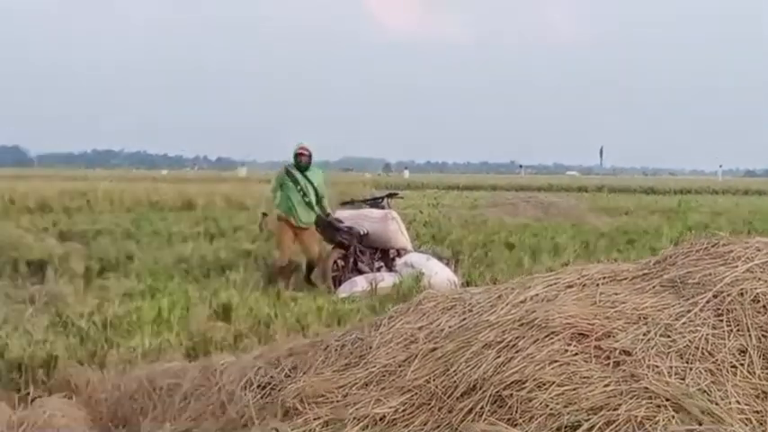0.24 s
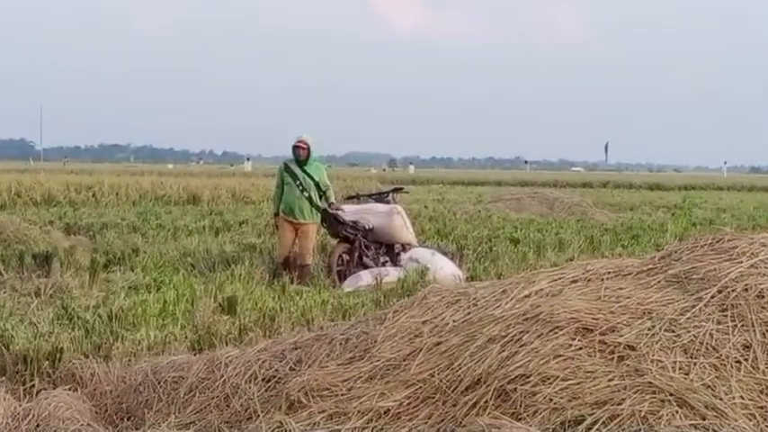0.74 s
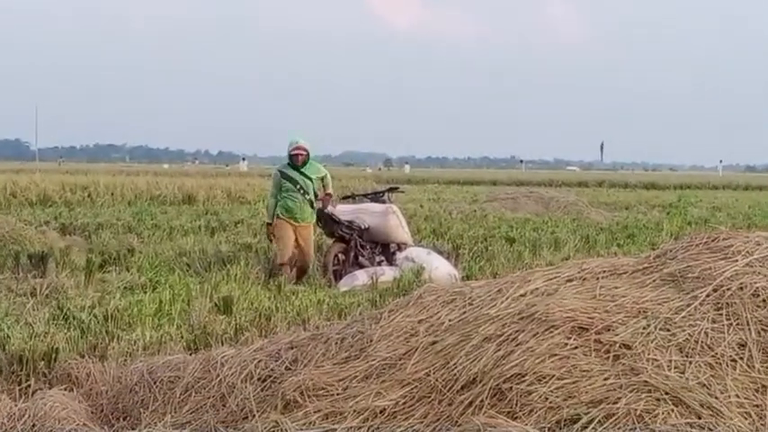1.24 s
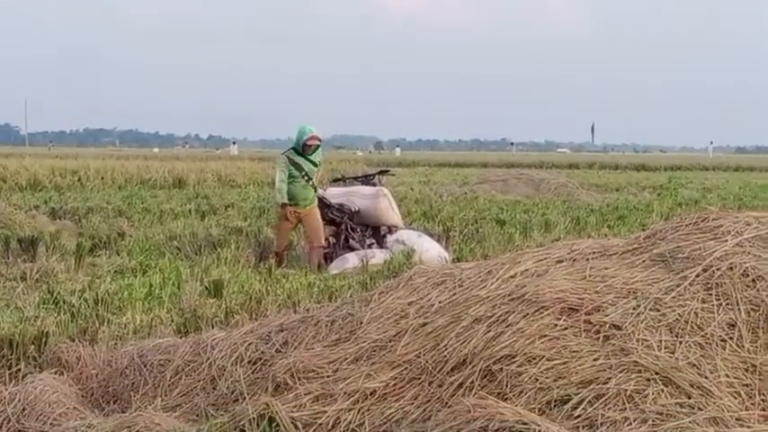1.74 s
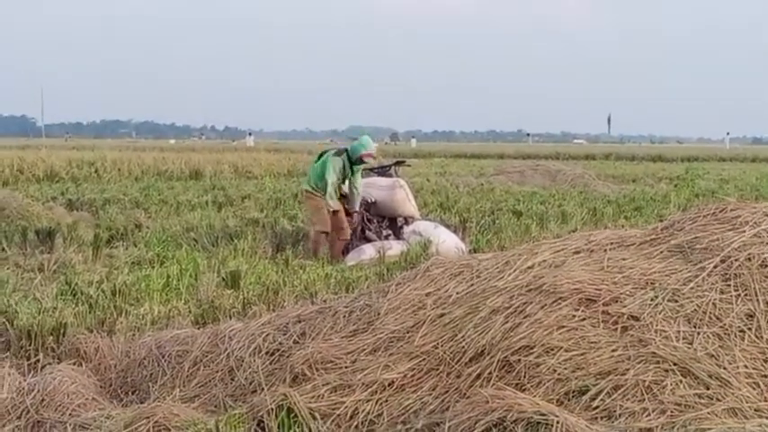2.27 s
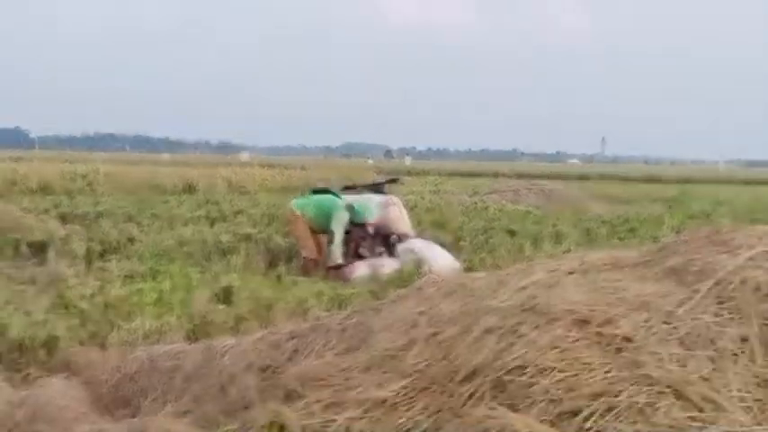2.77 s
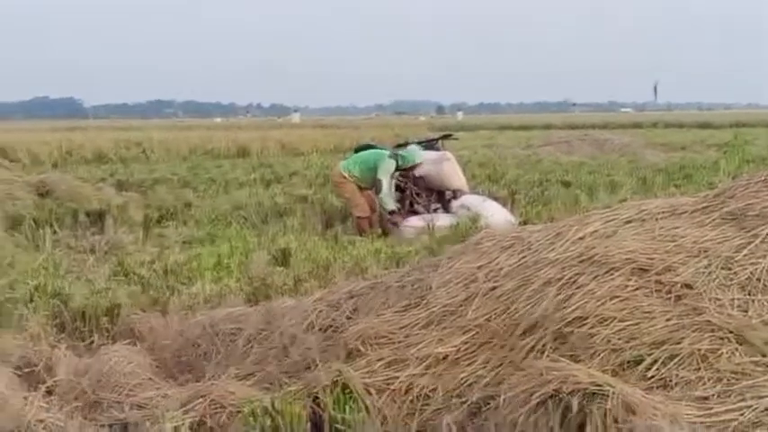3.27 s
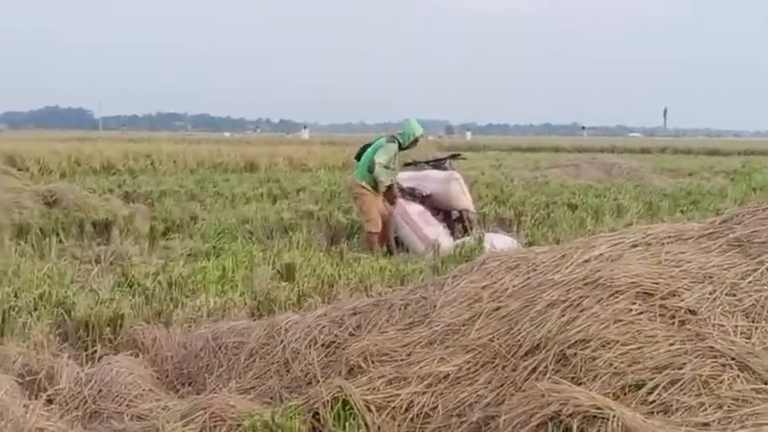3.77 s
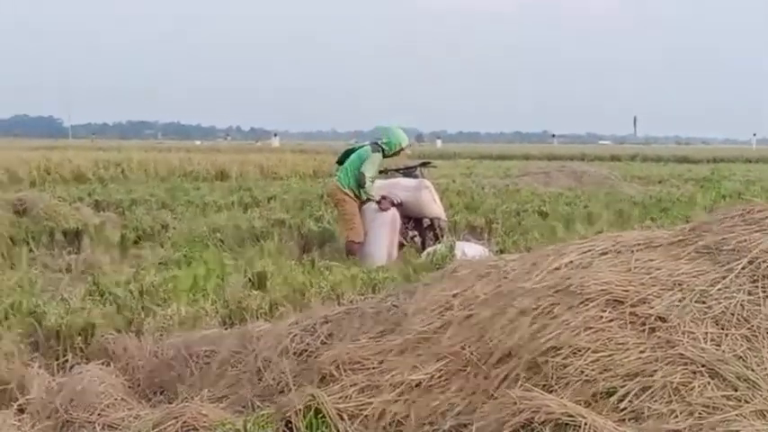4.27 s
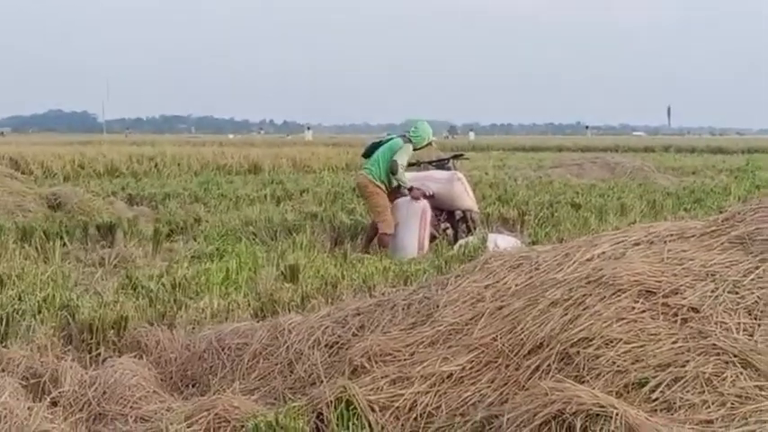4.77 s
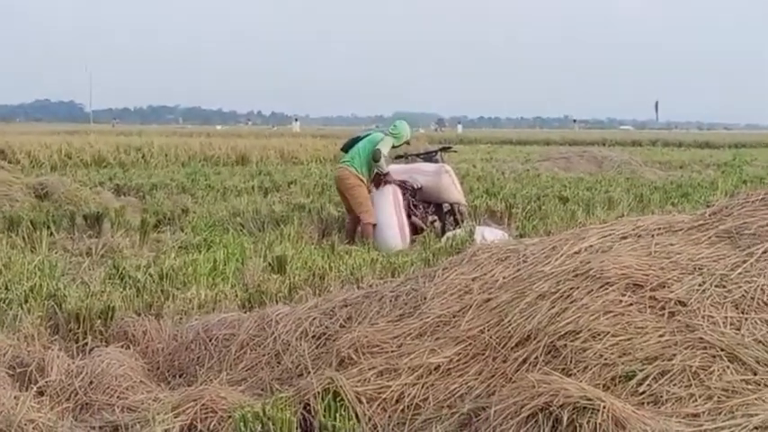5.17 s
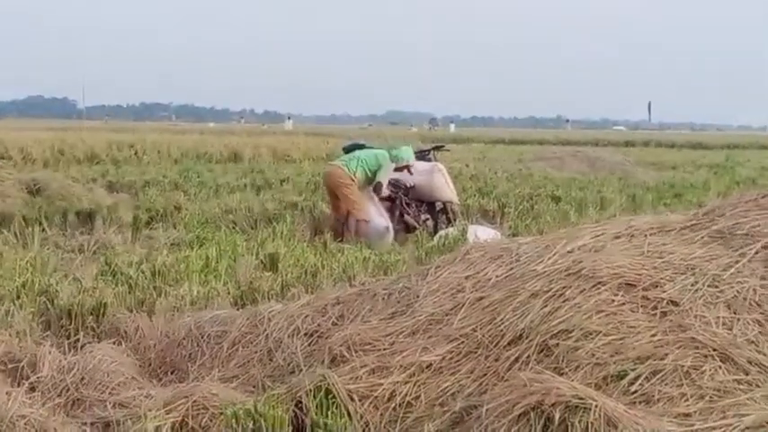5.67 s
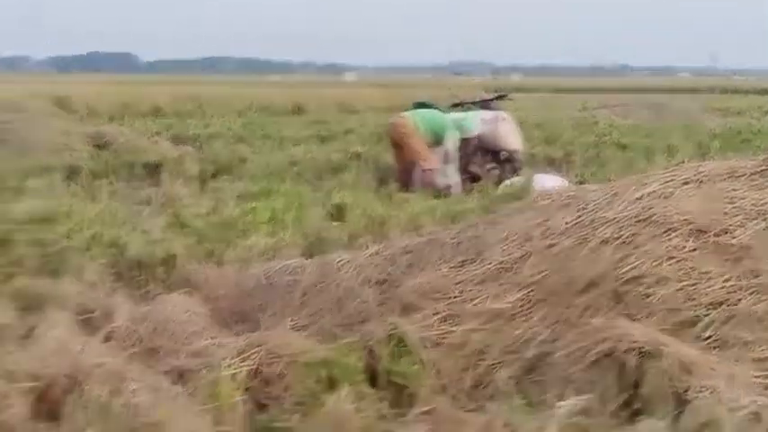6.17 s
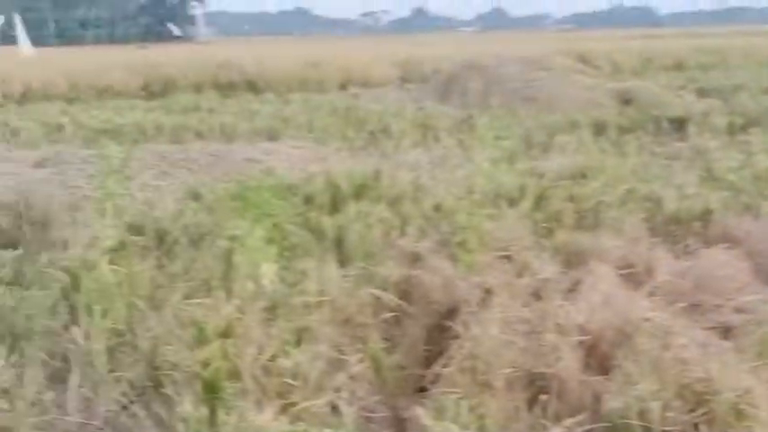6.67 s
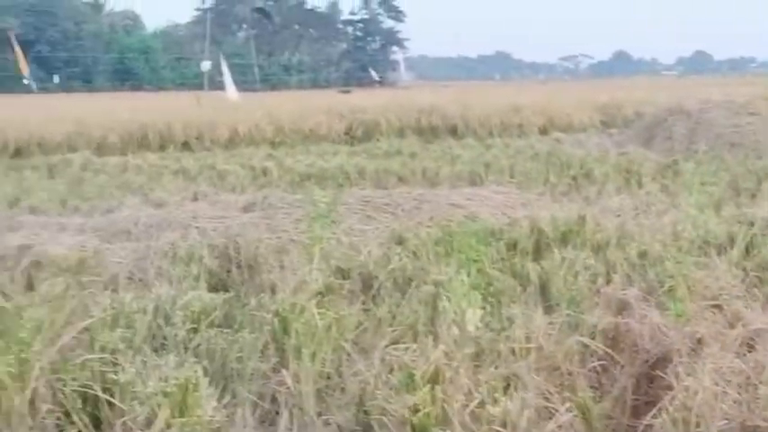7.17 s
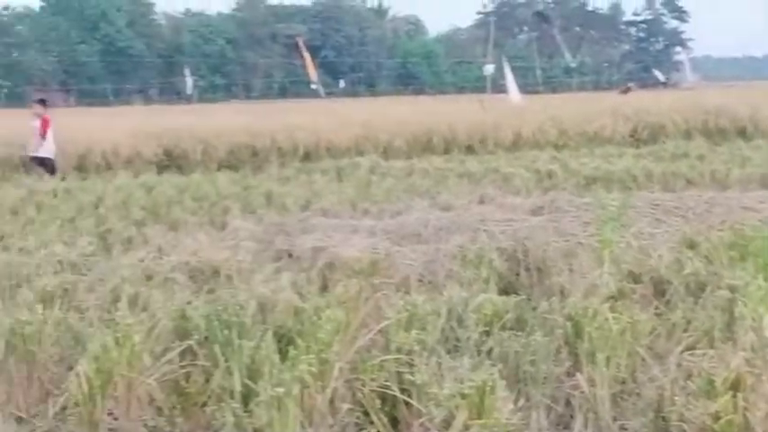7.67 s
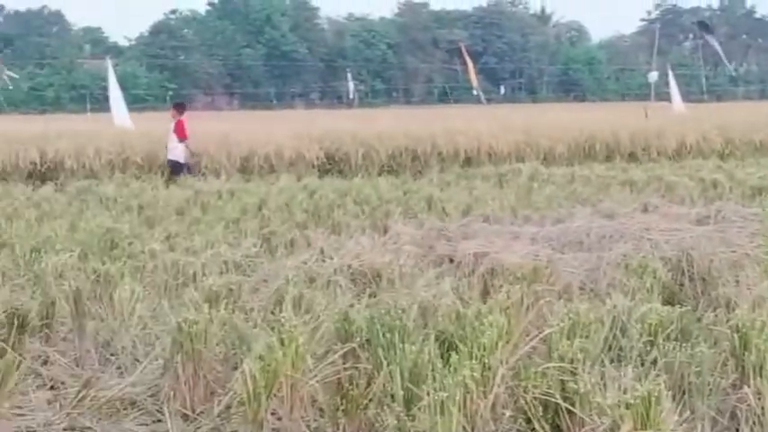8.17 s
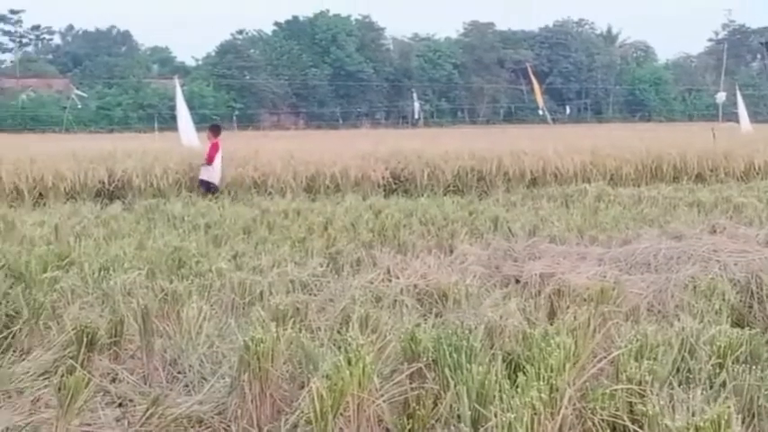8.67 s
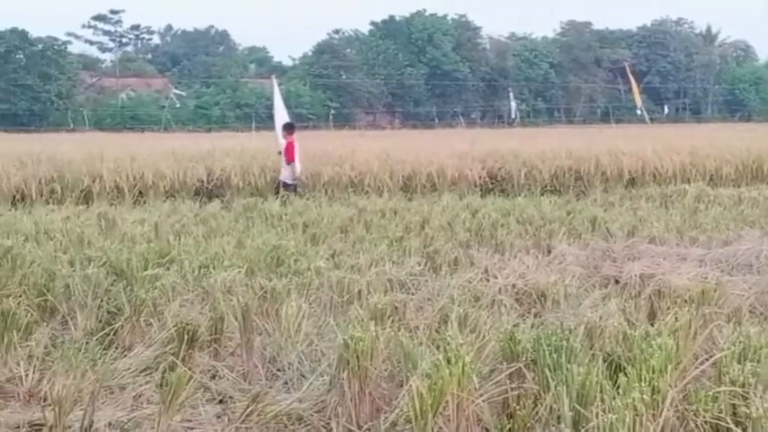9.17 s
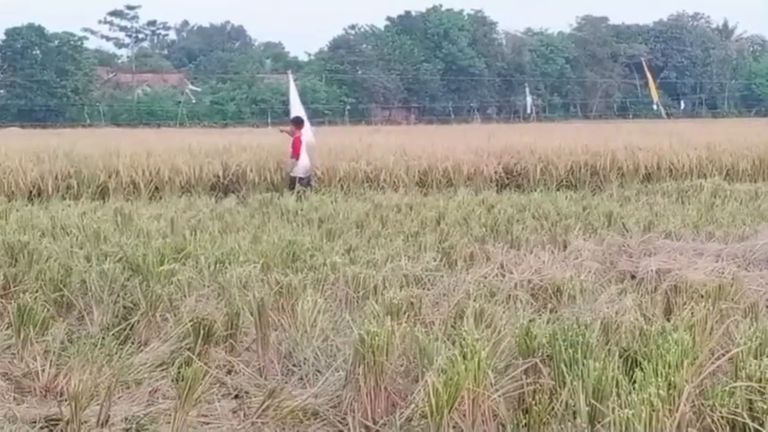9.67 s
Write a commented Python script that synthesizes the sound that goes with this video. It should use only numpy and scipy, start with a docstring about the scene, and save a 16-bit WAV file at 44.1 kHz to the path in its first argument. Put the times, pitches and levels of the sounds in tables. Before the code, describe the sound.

Small frogs peep, croak and quack over a cut rice field with insects ticking, while a small engine idles, stumbles, then revs up.

```python
"""Frogs call across a cut rice field: clear peepers, pulsed croakers, a hoarse rasp and a short quack.
Peeps, croaks and rasps are pulse-gated harmonic stacks; quacks are pulse trains ringing a throat.
Around them lie a band of crickets, a faint high rasp and a ticking insect: gated tones and noise.
A small two-stroke engine, puffs coloured by silencer and pipe, idles some way off on every second turn,
stumbles, then takes throttle and fires on every turn."""
import sys
import numpy as np
from scipy import signal
from scipy.fft import rfft, irfft, next_fast_len
from scipy.io import wavfile
from scipy.ndimage import map_coordinates

SR = 44100
rng = np.random.default_rng(int(sys.argv[2]) if len(sys.argv) > 2 else 0)


def file_out(sig):
    """Save sig as 16-bit WAV at sys.argv[1]."""
    # one column per channel
    cols = np.atleast_2d(sig).T
    # limit, then scale
    lim = np.clip(cols, -1, 1)
    pcm = np.round(lim * 32767).astype(np.int16)
    wavfile.write(sys.argv[1], SR, pcm)


def nominal_scale(level):
    """Amplitude ratio for a level in decibels (scalar or array-like)."""
    x = np.asarray(level, float) / 20
    return 10 ** x


N = 437472


def unit(x):
    """Normalization to unit root-mean-square."""
    return x / np.sqrt(np.mean(x ** 2) + 1e-20)


def along(points, hz):
    """Linear interpolation of (Hz, value) points on a logarithmic frequency axis."""
    f, v = np.transpose(points)
    return np.interp(np.log(hz + 1), np.log(f + 1), v)


def curves(rows):
    """Linear interpolation in time: one value per sample for each column after the time."""
    s, *cols = np.transpose(rows)
    return [np.interp(np.arange(N) / SR, s, c) for c in cols]


def wobble(rate):
    """Band-limited random fluctuation: a smooth curve through rate random knots a second."""
    return unit(map_coordinates(rng.standard_normal(int(N * rate / SR) + 4), [np.arange(N) * rate / SR]))


def coloured(x, points, lag=0.96):
    """Cepstral filtering that keeps white power; lag 1 is minimum phase, 0 is zero phase."""
    m = 2 * next_fast_len(N // 2 + 8192)
    gain = unit(nominal_scale(along(points, np.fft.rfftfreq(m, 1 / SR))))
    cepstrum = irfft(np.log(gain), m)
    cepstrum[1:m // 2] *= 1 + lag
    cepstrum[m // 2 + 1:] *= 1 - lag
    return irfft(rfft(x, m) * np.exp(rfft(cepstrum)), m)[:N]


def add(track, s, sound):
    """Linear superposition of a sound from a given time."""
    track[round(s * SR):][:len(sound)] += sound


# relative spectrum of the cricket band: pitch_hz [Hz], level_db [dB per Hz]
CRICKET_SPECTRUM = [(4800, -70), (5600, -34), (6200, -27), (6450, -12), (6900, -1.5), (7200, -9),
                    (7450, -20), (7700, -42), (8500, -88)]
# distant animals, levels before further gains: start_s [s], cricket_level_db [dB], far_chorus_level_db [dB]
DISTANT_LEVELS = [(0.0, -43.5, -57), (1.41, -44, -63.5), (6, -45.5, -61), (9.92, -44, -50.5)]


def crickets():
    """Stridulation: far wings blur into modulated noise; one nearer sounds a tone in rising chirps."""
    t = np.arange(N) / SR
    strikes = 2 * np.pi * np.cumsum(118 + 6 * wobble(6)) / SR  # tooth strikes, about 118 a second
    blur_gain = nominal_scale(2.2 * np.sin(strikes) + .9 * wobble(25))
    blur = unit(blur_gain * coloured(rng.standard_normal(N), CRICKET_SPECTRUM))
    beat = 9.42 * (t - 8.065) % 1  # position within each chirp period
    wing = np.sin(2 * np.pi * np.cumsum(7020 + 260 * beat + 40 * wobble(200)) / SR)
    chirp = np.sin(np.pi * np.minimum(beat / .65, 1)) ** .6
    near = unit(chirp * np.exp(.8 * np.cos(strikes)) * wing)
    near = near * nominal_scale(np.interp(t, [4, 7], [-12, -2.5]))
    return nominal_scale(curves(DISTANT_LEVELS)[0] - 6.5) * (blur + near)


# faint high insect: start_s [s], level_db [dB]
KATYDID_LEVEL = [(0, -89), (1.6, -100), (4.6, -105), (7.19, -77), (7.22, -102), (9.92, -88)]


def katydid():
    """Stridulation: rasps swell eight times a second, each a train of tooth strikes in a narrow band."""
    t = np.arange(N) / SR
    beat = 8.05 * (t - 6.19) % 1
    rasp = beat * (beat < .93) * np.exp(np.cos(2 * np.pi * 127 * t))  # 127 strikes a second
    band = [(8700, -50.5), (9200, -2.5), (9700, -3), (10200, -53.5)]  # (Hz, relative dB)
    return nominal_scale(curves(KATYDID_LEVEL)[0]) * coloured(unit(rasp * rng.standard_normal(N)), band, lag=0)


# relative spectrum of the open air: pitch_hz [Hz], level_db [dB]
AIR_SPECTRUM = [(25, -9), (750, -18), (1150, -8.5), (1750, -18), (2600, -18), (3300, -18.5), (4600, -32.5),
                (7800, -58), (8600, -93)]


def air():
    """Incoherent summation: the farthest frogs and the open air merge into slowly swelling noise."""
    swell_db = 3.5 * wobble(14)
    level_db = -67.5 + .5 * (curves(DISTANT_LEVELS)[1] + 64) + swell_db
    return nominal_scale(level_db) * coloured(rng.standard_normal(N), AIR_SPECTRUM)


def hiss():
    """Self-noise: the faint, treble-weighted random hiss of a microphone."""
    return nominal_scale(-87) * coloured(rng.standard_normal(N), [(9000, -30.5), (15000, -0.5)])


# crankshaft: start_s [s], speed [turns per s]
CRANK_SPEED = [(0, 35.03), (3.3, 34.73), (4, 35.39), (5.2, 35.31), (6.4, 36.1), (7.17, 37.97),
               (7.27, 28.69), (7.47, 39.27), (7.53, 23.1), (7.62, 33.24), (7.72, 29.08), (7.84, 34.89),
               (8.1, 33.53), (8.3, 34.69), (8.71, 37.6), (8.83, 46.6), (8.89, 50.1), (9.02, 41.9),
               (9.06, 39.5), (9.17, 40.1), (9.29, 37.4), (9.47, 40.6), (9.71, 44.4), (9.786, 45.2),
               (9.92, 43.4)]
# throttle: start_s [s], opening [0-1]; a closed one skips every second firing and burns unevenly
THROTTLE_OPENING = [(0, .05), (5.9, .05), (7.45, 0.1), (7.505, 0.22), (7.525, 0.56), (7.55, 0.56),
                    (7.56, 0.03), (7.68, 0), (7.7, 0.55), (7.82, 0.63), (7.86, 0.42), (8.67, 0.4),
                    (8.71, 0.62), (8.88, 0.84), (9.1, 0.78), (9.92, 0.87)]
# the charge burns weakly or fails to light: start_s [s], length_s [s], level_db [dB]
WEAK_CHARGES = [(0, .62, -6), (5.992, 0.66, -4.5), (7.25, .125, -23), (7.63, .05, -21)]


def firings():
    """Intermittent combustion: one pressure impulse a turn, its strength set by throttle and charge."""
    first_firing = .66  # turns before the first firing
    boom_db, boom_fall_db = -28, 3  # wide open; lost for each tenfold closing of the throttle
    bark_db, bark_fall_db = -22, 23.5
    bark_holds_db = 6  # a weak charge thins the boom; the bark gives way only past this loss
    (speed,), (throttle,), clock = curves(CRANK_SPEED), curves(THROTTLE_OPENING), np.arange(N) / SR
    throttle = np.clip(throttle, .01, 1)
    lit_db = sum(db * ((clock >= s) & (clock < s + length)) for s, length, db in WEAK_CHARGES)
    boom_db = boom_db + boom_fall_db * np.log10(throttle) + lit_db
    bark_loss_db = 1.2 * np.minimum(lit_db + bark_holds_db, 0)
    bark_db = bark_db + bark_fall_db * np.log10(throttle) + bark_loss_db

    turns = np.cumsum(speed) / SR - first_firing + 2
    at = np.flatnonzero(np.diff(np.floor(turns)))
    odd, opening = np.floor(turns[at + 1]) % 2, throttle[at]
    chance = rng.standard_normal((len(at), 3))
    jitter_s = (.00009 + .0006 * (1 - opening) ** 2) * chance[:, 0]  # lean charges light late or early
    at = np.clip(at + (jitter_s * SR).astype(int), 0, N - 1)
    per_puff = np.sqrt(SR / speed[at])  # keeps mean power independent of speed
    scatter_db = 1.1 + 2 * (1 - opening) ** 2
    # past a third of throttle the in-between turn fires too
    catches = np.clip((opening - .36) / .25, .04, 1)
    bark_share = np.where(odd, catches, 1) / np.sqrt((1 + catches ** 2) / 2)
    boom_share = np.where(odd, 0.5 + 0.5 * catches, 1)
    bark, boom = np.zeros((2, N))
    bark[at] = per_puff * bark_share * nominal_scale(bark_db[at] + 0.53 * scatter_db * chance[:, 1])
    boom[at] = per_puff * boom_share * nominal_scale(boom_db[at] + 0.5 + scatter_db * chance[:, 2])
    return bark, boom, throttle, turns


def churn(puffs, t60):
    """Turbulent jet noise: each puff excites noise that decays by 60 dB in t60 seconds."""
    t = np.arange(SR // 20) / SR
    envelope = signal.fftconvolve(puffs, nominal_scale(-60 * t / t60))[:N]
    return envelope * rng.standard_normal(N) * np.sqrt(14 / t60 / SR)


# the silencer's relative response: pitch_hz [Hz], level_db [dB]
SILENCER_BOOM = [(30, -43), (70, -29), (105, -10.5), (135, 2.5), (160, 1), (200, -18), (250, -51),
                 (500, -130)]


def silencer_boom(puffs, throttle):
    """Cavity resonance: puffs and their turbulence excite the silencer, which booms on."""
    rough = np.clip(.2 + .45 * (1 - throttle), 0, 1)  # turbulent share
    source = np.sqrt(1 - rough) * puffs + np.sqrt(rough) * churn(puffs, 0.098)
    return coloured(source, SILENCER_BOOM, lag=0.6)


# the pipe mouth's relative response: pitch_hz [Hz], idle_level_db [dB], part_throttle_level_db [dB],
# wide_open_level_db [dB]
PIPE_BARK = [(71, -62, -64, -73), (123, -27, -28.5, -13), (229.4, -2.5, -4.5, 0), (308.1, 5.5, 1, 7.5),
             (321, -21.5, 7.5, 5.5), (380, -14, -10.5, 0), (458, -16, -24, -3), (497, -30, -37.5, -17.5),
             (633, -38.5, -45, -27.5), (720, -42, -60.5, -42.5), (1130, -130, -130, -130)]


def pipe_bark(puffs, throttle):
    """Pipe resonance: the mouth's colour crossfades between three throttle openings."""
    source = puffs + (.03 + .5 * (1 - throttle)) * churn(puffs, .2)
    hz, *colours = np.transpose(PIPE_BARK)
    shares = [np.interp(throttle, [.1, .45, .9], row) for row in np.eye(3)]
    return sum(coloured(source * share, np.c_[hz, colour], lag=0.36)
               for share, colour in zip(shares, colours))


def engine():
    """Source and resonator: exhaust puffs bark at the pipe mouth and boom in the silencer."""
    bark_puffs, boom_puffs, throttle, turns = firings()
    boom = silencer_boom(boom_puffs, throttle)
    bark = pipe_bark(bark_puffs, throttle)
    # at idle the exhaust dips once every two turns, between the full firings
    hush = np.exp(4.3 * (np.cos(np.pi * (turns + 0.84)) - 1))
    boom_gain = 1 - 0.75 * (1 - throttle) * hush
    bark_gain = 1 - 1.8 * (1 - throttle) ** 2 * hush
    return boom * boom_gain + bark * bark_gain


def call(ms, db, hz, low_db, upper, rise, gate_hz, depth, lasting, rough, fade_s):
    """Harmonic synthesis: partials on a rising pitch, gated by throat pulses that last a while."""
    t = np.arange(int((ms + 8) * SR / 1000)) / SR  # 8 ms more leave room for the fades
    u = t / t[-1]

    def slow():
        return map_coordinates(rng.standard_normal(40), [t / .003])

    fades = np.minimum(1, np.minimum(t / .013, (t[-1] - t) / fade_s))
    shape = np.sin(np.pi / 2 * fades) ** 2 * nominal_scale(1.6 * slow())
    phase = 2 * np.pi * hz * (t + rise * (u / 2 - .6) * t) + rough * slow()
    # far calls arrive duller
    upper_db = upper + rng.normal(0, 4, len(upper)) + .55 * (db + 30)
    levels = np.r_[low_db, 0, upper_db]
    bloom = -60 * (u - .65) ** 2  # upper partials swell late, as the sac tightens
    stack = sum(nominal_scale(g + max(k - 1, 0) ** .5 * bloom) * np.sin((k + 1) * phase)
                for k, g in enumerate(levels))
    gate_hz = gate_hz * nominal_scale(rng.normal(0, .4))
    pulses = unit(np.exp(1.3 * np.cos(2 * np.pi * gate_hz * (t - .006) + .35 * slow())))
    depth = np.clip(depth, 0, 1) * np.exp(-(t / lasting) ** 4)
    return np.sqrt(2) * nominal_scale(db) * shape * (1 - depth + depth * pulses) * stack


def spread():
    """Natural variation: a random length factor with a spread of 1 dB."""
    return nominal_scale(rng.normal(0, 1))


PEEP_MS = 25.9  # nominal, before spread and fade room
# near peeps: start_s [s], second_partial_level_db [dB], pitch_hz [Hz], first_over_second_db [dB]
PEEP_CALLS = [(0.047, -38.5, 1131, 3.5), (1.161, -30.5, 1174, 3), (1.597, -45.5, 1094, -11),
              (1.84, -29.5, 1167, 2), (2.083, -41.5, 1140, -10.5), (2.206, -26.5, 1124, -15.5),
              (2.453, -31, 1140, 2), (2.865, -37.5, 1194, -9.5), (3.047, -27.5, 1168, 1),
              (3.44, -35, 1231, -12.5), (3.473, -31, 1105, -13.5), (3.894, -36.5, 1130, 5.5),
              (4.17, -37.5, 1231, -12), (4.278, -29, 1090, -13.5), (4.967, -29, 1074, -1.5),
              (5.57, -30.5, 1112, -1), (5.601, -27.5, 1093, -12), (6.163, -30.5, 1095, 0),
              (6.771, -37.5, 1114, 10), (7.41, -34, 1156, 9.5), (7.886, -27.5, 1167, 4),
              (8.347, -38, 1173, 12), (9.158, -24, 1154, 2.5), (9.871, -27, 1153, 4)]
# partials 3-5 of a peep: level over the second [dB]
PEEP_UPPER_DB = [-18, -33, -26]


def peeps(out):
    """Transient amplitude modulation: peeps stutter as they start, then run clear."""
    for s, db, hz, low_db in PEEP_CALLS:
        add(out, s - .005, call(PEEP_MS * spread(), db, hz, low_db, PEEP_UPPER_DB, rise=.055, gate_hz=130,
                                depth=.4, lasting=.013, rough=.22, fade_s=.01))


# partials 3-5 of a croak: level over the second [dB]
CROAK_UPPER_DB = [-21, -37, -42]


def croak(ms, db, hz, depth):
    """Sustained amplitude modulation: pulsed throughout; higher voices carry more first partial."""
    return call(ms, db, hz, -16 + 0.068 * (hz - 1300), CROAK_UPPER_DB, rise=0.039, gate_hz=156.6,
                depth=depth, lasting=0.74, rough=0.4, fade_s=0.026)


# near croaks: start_s [s], second_partial_level_db [dB], pitch_hz [Hz]
CROAK_CALLS = [(0.071, -26, 1258), (0.183, -39.5, 1232), (0.768, -30.5, 1218), (0.917, -37, 1235),
               (2.582, -40.5, 1243), (3.7, -58, 1257), (4.455, -51.5, 1220), (4.58, -50.5, 1387),
               (4.78, -47, 1279), (5.187, -47.5, 1355), (5.315, -44.5, 1294), (5.4, -43, 1270),
               (5.714, -39, 1282), (5.81, -43, 1304), (6.311, -33.5, 1312), (6.41, -35, 1370),
               (6.488, -48.5, 1408), (6.646, -30, 1320), (6.732, -42.5, 1286), (6.812, -33, 1396),
               (6.885, -48, 1340), (6.998, -27, 1300), (7.091, -48.5, 1283), (7.184, -31.5, 1368),
               (7.247, -44.5, 1333), (7.398, -30.5, 1340), (7.578, -31, 1391), (7.671, -39, 1360),
               (7.765, -31.5, 1341), (7.957, -38.5, 1388), (8.045, -36, 1392), (8.147, -29.5, 1340),
               (8.232, -37, 1326), (8.345, -33.5, 1408), (8.476, -41, 1374), (8.569, -30, 1323),
               (8.696, -35, 1290), (8.773, -32.5, 1327), (8.812, -39.5, 1397), (8.857, -49.5, 1285),
               (8.936, -26.5, 1302), (8.985, -44, 1346), (9.134, -34.5, 1382), (9.17, -40.5, 1406),
               (9.333, -27.5, 1334), (9.428, -41, 1300), (9.474, -47.5, 1366), (9.509, -34, 1323),
               (9.554, -40, 1383), (9.626, -33, 1310), (9.662, -28.5, 1300), (9.749, -35, 1312),
               (9.846, -37, 1340)]


def croaks(out):
    """Dispersion by scattering: fainter, farther croaks arrive drawn out."""
    for s, db, hz in CROAK_CALLS:
        ms = 40 - .5 * (db + 30.5)
        add(out, s - .005, croak(ms, db, hz, depth=0.8))


def far_chorus(out):
    """Random superposition: a scatter of far croaks that thickens with time."""
    far_db = curves(DISTANT_LEVELS)[1]
    for when, length, size, pitch, pulsed in rng.random((260, 5)):
        s = when ** .8 * (N - 1) / SR
        db = far_db[int(s * SR)] + 9 * size
        add(out, s, croak(15 + 40 * length, db, 1120 + 380 * pitch, depth=.7 * pulsed))


# insect ticks, peak before the body's response: start_s [s], level_db [dB]
TICK_TIMES = [(0.335, -32), (0.595, -40), (0.7924, -31), (1.012, -28.5), (1.1774, -30), (1.3015, -27.5),
              (1.5502, -27.5), (1.7425, -28), (1.957, -27), (2.4463, -26), (2.6391, -25.5), (2.8115, -26.5),
              (3.023, -25.5), (3.2263, -22), (3.7066, -22.5), (3.8601, -30.5), (3.93, -19.5),
              (4.0517, -29.5), (4.3125, -21), (4.4704, -33), (4.5403, -20), (4.6547, -31), (4.79, -19),
              (4.8519, -34), (5.0624, -32.5), (5.269, -29.5), (5.47, -30.5), (6.1404, -31), (6.3374, -31.5),
              (6.5434, -31), (6.7845, -33), (6.9714, -36), (7.1844, -41.5), (8.1189, -42), (8.3524, -34)]
# what the tick's body lets through, relative: pitch_hz [Hz], level_db [dB]
TICK_RESPONSE = [(2500, -39.5), (4600, -28.5), (5300, -2.5), (7500, -7.5), (8300, 9.5), (9500, -29),
                 (11000, -59)]


def ticks():
    """Frequency modulation: each tick sweeps up to a plateau and down in 4.5 ms; weak ones sit lower."""
    out, u = np.zeros(N + SR), np.linspace(0, 1, int(0.0045 * SR))
    faint = rng.random((90, 2)) * [N / SR, -9] + [0, -46]  # others tick farther off
    for s, db in np.r_[TICK_TIMES, faint + [.01, 0]]:
        hz = 7650 - 45 * max(-26 - db, 0) - 500 * u - 2200 * (2 * u - 1) ** 4
        hz = hz * nominal_scale(rng.normal(0, .12))
        envelope = nominal_scale(db - 2 - u) * np.sin(np.pi * u) ** .5
        add(out, s - .001, envelope * np.sin(2 * np.pi * np.cumsum(hz) / SR))
    return coloured(out[:N], TICK_RESPONSE, lag=0)


# one pulsed peep: start_s [s], second_partial_level_db [dB], pitch_hz [Hz], first_over_second_db [dB]
GROWL_CALL = (0.449, -37, 1200, 7)


def growl(out):
    """Deep amplitude modulation: a peep pulsed from end to end."""
    s, db, hz, low_db = GROWL_CALL
    add(out, s - .005, call(PEEP_MS, db, hz, low_db, [-6, -20, -20], rise=.1, gate_hz=160,
                            depth=.9, lasting=1, rough=.5, fade_s=.01))


# quacks, mostly a tenth of a second after a peep, relative level: start_s [s], level_db [dB]
QUACK_CALLS = [(0.554, -42), (1.25, -49.5), (1.319, -40), (1.934, -38.5), (2.547, -37), (2.57, -47.5),
               (2.635, -41.5), (3.135, -42.5), (3.216, -40.5), (3.991, -42), (5.058, -37.5), (5.662, -38),
               (5.734, -45.5), (6.257, -38.5), (6.858, -36), (6.885, -42), (7.504, -36.5), (7.977, -34.5),
               (8.048, -35.5), (8.344, -30.5), (8.427, -35.5), (8.489, -39), (9.258, -33)]
# quack throat resonances: pitch_hz [Hz], width_hz [Hz], level_db [dB]
QUACK_THROAT = [(1140, 54, 12.5), (2150, 144, 1.5), (2824, 308, 4), (3125, 110, 0.5), (3450, 310, -22)]


def quacks():
    """Source-filter production: a short burst of uneven fast pulses rings the throat."""
    pulses = np.zeros(N)
    for s, db in QUACK_CALLS:
        length_s = 19.9 * spread() / 1000
        step = np.cumsum(.0024 * nominal_scale(rng.normal(0, 1.3, 20)))  # pulse times, about 2.4 ms apart
        step = step[step < length_s]
        swell = np.sin(np.pi * step / (length_s + .003))
        uneven = nominal_scale(rng.normal(0, 2, len(step)))
        pulses[((s + step) * SR).astype(int)] = nominal_scale(db + 36) * swell * uneven
    f = np.fft.rfftfreq(N, 1 / SR)
    # neighbouring resonances above the second alternate in sign
    throat = sum((-1) ** max(k - 1, 0) * nominal_scale(db) * 1j * f * width / (c * c - f * f + 1j * f * width)
                 for k, (c, width, db) in enumerate(QUACK_THROAT))
    band = 1 / (1 + (950 / (f + 1)) ** 12) / (1 + (f / 4100) ** 10)
    return irfft(rfft(pulses) * throat * band, N)


# a hoarse frog farther off: start_s [s], second_partial_level_db [dB]
RASP_CALLS = [(3.121, -64), (3.59, -64), (4.399, -64), (5.184, -62), (5.561, -60.5), (5.964, -61.5)]


def rasps(out):
    """Phase roughness: a hoarse, level-pitched call with a strong first partial."""
    for s, db in RASP_CALLS:
        add(out, s, call(39, db, 1550, 9.9, CROAK_UPPER_DB, rise=0, gate_hz=155,
                         depth=0.3, lasting=1, rough=0.41, fade_s=0.021))


def frogs():
    """Radiation cutoff: all partial-stack calls together; a small throat sends out nothing low."""
    out = np.zeros(N + SR)
    for voice in (peeps, croaks, far_chorus, growl, rasps):
        voice(out)
    f = np.fft.rfftfreq(N, 1 / SR)
    return irfft(rfft(out[:N]) / (1 + (900 / (f + 1)) ** 16), N)


# field echo: pitch_hz [Hz], t60_s [s]
FIELD_DECAY = [(1100, 0.11), (2500, 0.096), (7000, 0.14)]


def field(x, late_s=.004):
    """Diffuse scattering off stubble and banks: the echo drifts into a new one every half second."""
    step = SR // 2
    out, x = np.zeros(N + 5 * step), np.pad(x, (step, 2 * step))
    for a in range(0, N + step, step):
        hz, t, z = signal.stft(rng.standard_normal(step), SR, nperseg=256)
        decay = nominal_scale(-60 * t / along(FIELD_DECAY, hz)[:, None])
        tail = signal.istft(z * decay, SR, nperseg=256)[1]
        tail = tail / np.linalg.norm(tail)
        piece = x[a:a + 2 * step] * np.hanning(2 * step) ** .75
        add(out, a / SR + late_s, signal.fftconvolve(piece, tail)[:5 * step // 2])
    return out[step:step + N]


def scene():
    """Superposition: direct calls and ticks, their field echo, the engine and the steady backgrounds."""
    background = crickets() + katydid() + air() + hiss()
    motor = engine()
    near, insect = frogs() + quacks(), ticks()
    echo = field(nominal_scale(-7.5) * near + nominal_scale(-7) * insect)
    return (near + insect + echo + motor + background)[None]


def roll_off(x):
    """The treble ends steeply here."""
    return signal.sosfilt(signal.butter(12, 15500, fs=SR, output="sos"), x)


def record(dry):
    """Direct pickup: the finished mix goes on with no added gain, only the steep end of the treble."""
    return roll_off(dry)


dry = scene()
out = record(dry)
file_out(out)
```